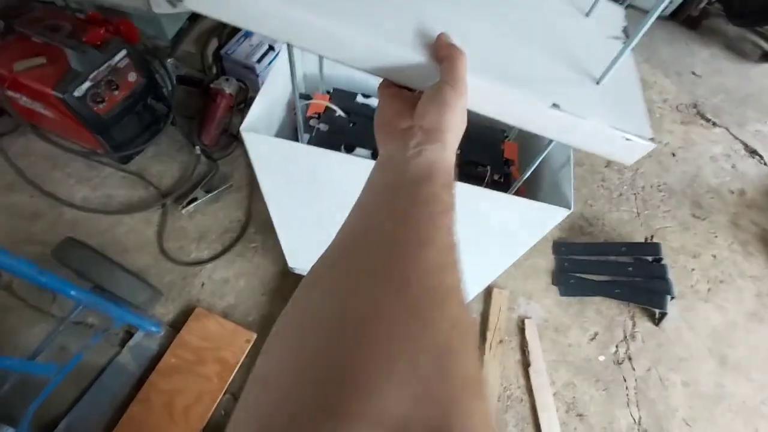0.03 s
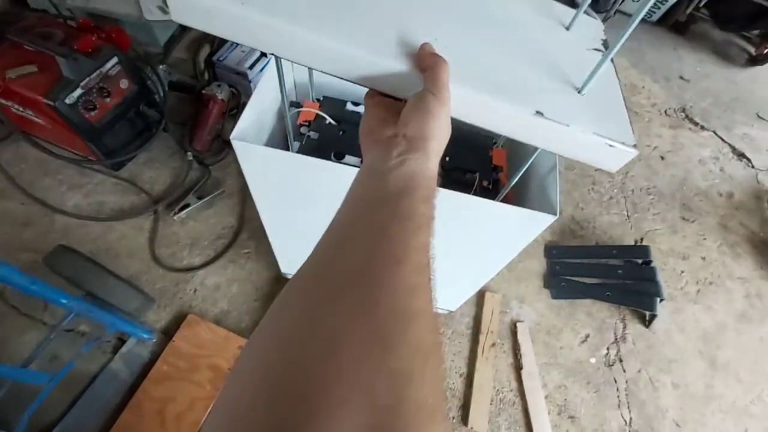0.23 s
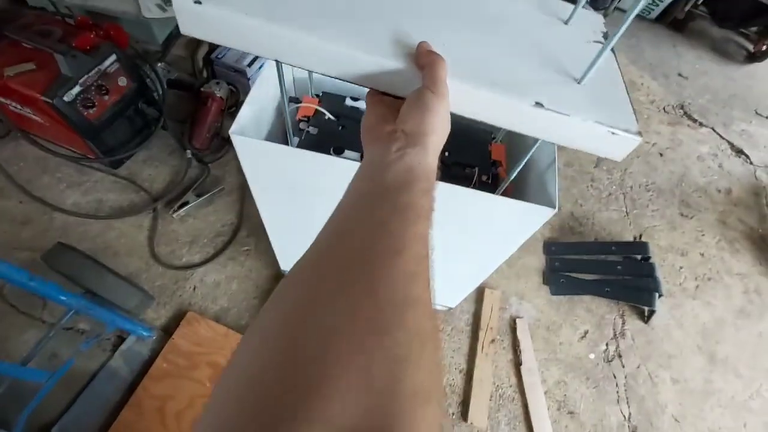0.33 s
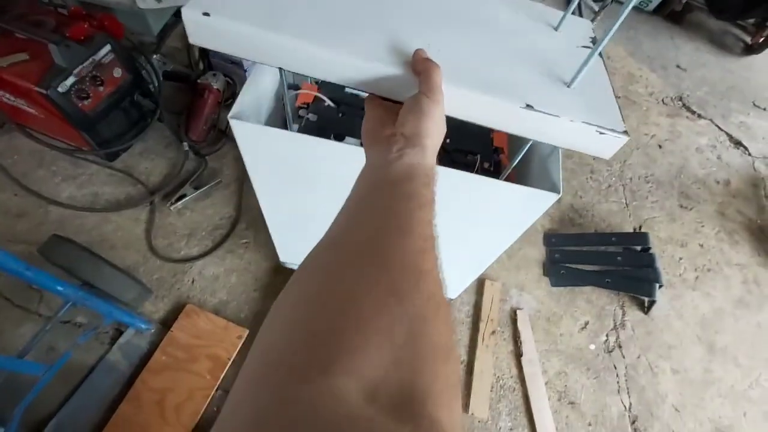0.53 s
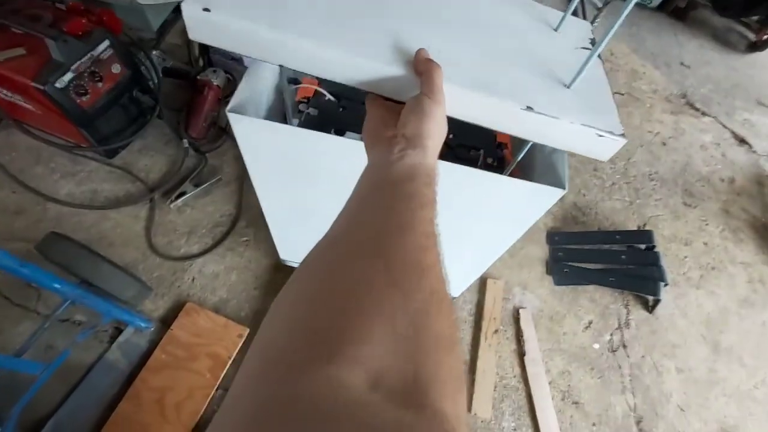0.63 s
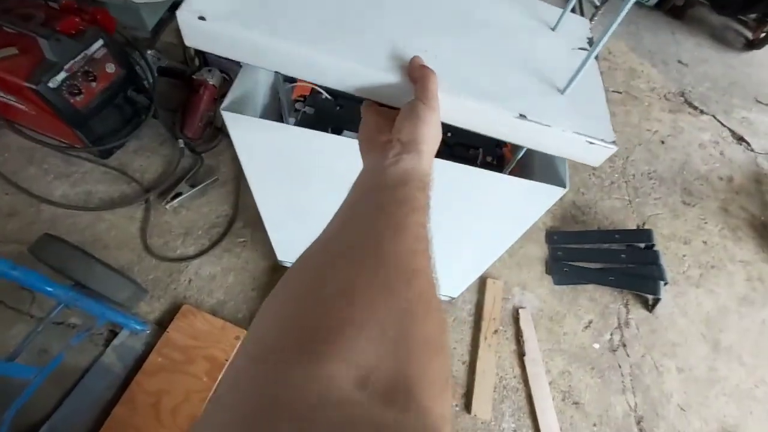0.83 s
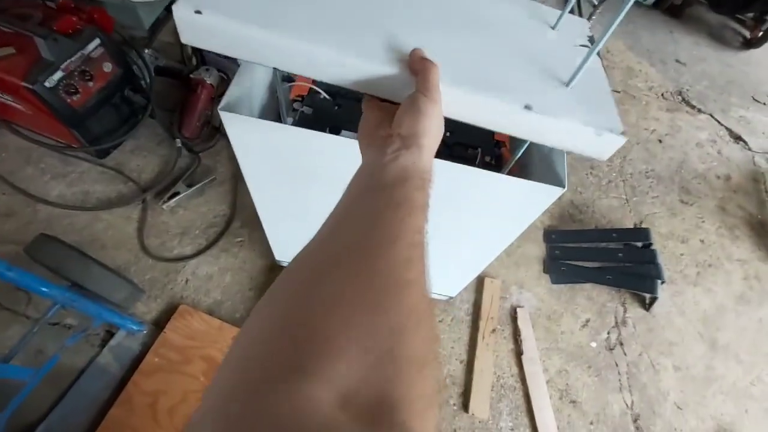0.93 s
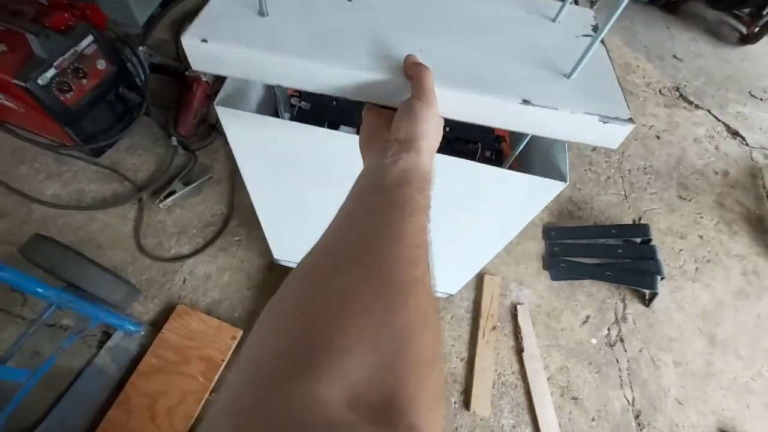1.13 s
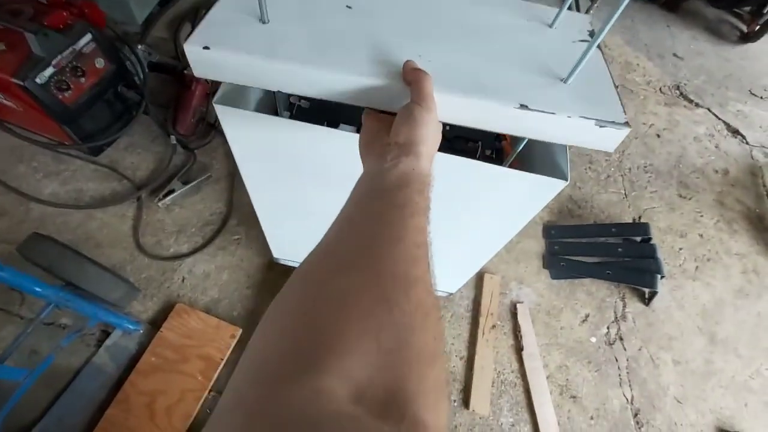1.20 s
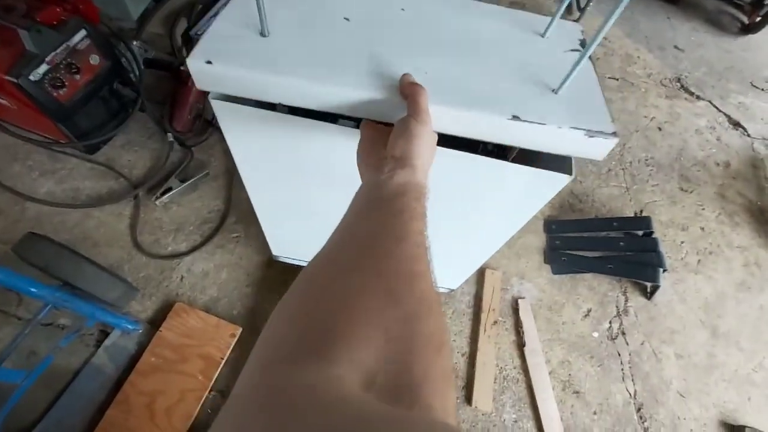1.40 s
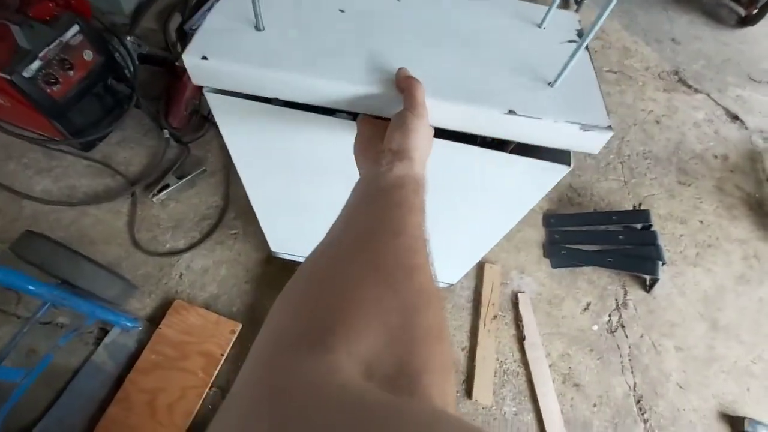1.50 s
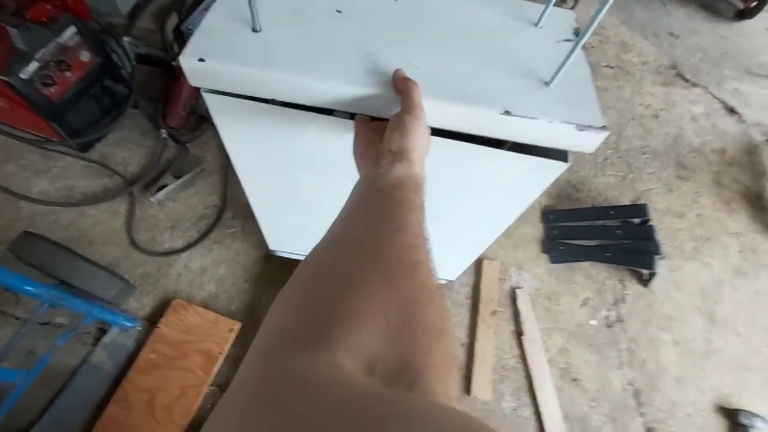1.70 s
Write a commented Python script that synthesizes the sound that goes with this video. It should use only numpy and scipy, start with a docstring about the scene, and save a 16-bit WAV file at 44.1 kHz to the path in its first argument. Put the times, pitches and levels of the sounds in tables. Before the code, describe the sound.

Sheet metal dragged over a box rim in two rattling, squealing shoves, then settling.

```python
"""Steel lid dragged over its box

A sheet-steel lid is dragged over the rim of its metal box in two long shoves, then drops into its seat.
Stick-slip friction, thousands of slips a second, drives the panels into clattering, booming vibration;
now and then the friction locks onto one panel mode and it squeals. A faint workshop rumble lies below."""
import sys
import numpy as np
from scipy import signal
from scipy.io import wavfile
from scipy.ndimage import uniform_filter1d

SR = 44100
rng = np.random.default_rng(int(sys.argv[2]) if len(sys.argv) > 2 else 0)


def waveform_to_disk(signal):
    """Save audio, clipped to [-1, 1], as 16-bit WAV at the path in sys.argv[1]."""
    frames = np.transpose(np.atleast_2d(signal))
    scaled = np.clip(frames, -1, 1) * 32767
    samples = np.round(scaled).astype(np.int16)
    wavfile.write(sys.argv[1], SR, samples)


N = 77175
T = np.arange(N) / SR

# friction of the edge on the rim: time_s, force_db, extra_treble_db
RUBBING = [(0, -29.5, -14), (0.019, -44, 2), (.045, -29, -9), (0.073, -29.5, -7), (0.106, -46.5, -22),
           (.125, -44.5, -1), (0.148, -29.5, -17), (.19, -37.5, -6.5), (0.22, -26, -11), (.236, -15.5, 1),
           (0.312, -16, 1.5), (.375, -13, 1.5), (.48, -16, 0), (.53, -18.5, 1.5), (0.628, -18, 2.5),
           (.68, -23, 0), (0.719, -23, 1), (.77, -25.5, -7.5), (.797, -21.5, 1.5), (.825, -34, -0.5),
           (0.918, -36, -13.5), (0.938, -18, 0.5), (.97, -15, 3.5), (1.035, -15.5, -1), (1.11, -12.5, 0.5),
           (1.211, -16.5, 3), (1.261, -18.5, -2.5), (1.322, -20.5, -3.5), (1.36, -13.5, 1),
           (1.426, -16, -2.5), (1.46, -26.5, -4.5), (1.509, -30.5, -8), (1.548, -27.5, 0), (1.594, -37, -5),
           (1.62, -42.5, -10), (1.691, -39.5, -4.5), (1.75, -55, -18)]
# bumps of the lid against the box: start_s, strength_db, cutoff_hz
IMPACTS = [(.001, -8, 6000), (.025, -0.5, 8600), (0.2259, 11.5, 9300), (0.366, 17, 1000),
           (0.787, 4.5, 6950), (.795, 10, 390), (.927, 5.5, 14100), (0.949, 9, 465), (1.328, 21.5, 1600),
           (1.336, 16, 800), (1.379, 15, 2465), (1.402, 16.5, 1200), (1.5185, -1.5, 9000), (1.648, 15, 280),
           (1.683, -8.5, 5100)]
# strong modes of lid and box: pitch_hz, level_db, t60_s, left_minus_right_db, left_lead_rad
PANEL_MODES = [(300.4, -24, 0.073, 39, 5), (345.3, -15, 0.19, 6.5, -0.1), (382.7, -13.5, 0.23, 3, 1.31),
               (497.6, -29.5, 1.4, 10, -0.1), (796.7, -23, 0.48, -1, 1.94), (829.7, -14, 0.17, -1.5, -0.23),
               (1004, -17.5, 0.27, 2, -.7), (1154, -13, 0.22, -5, -2.1), (1362, -28, 0.47, 24, 7.9),
               (1443, -13.5, 0.1, -1, -0.9), (1583, -19.5, 0.42, 9, -1.7), (1640, -13, .35, 1.5, -0.95),
               (1545, -40.5, 1.2, 20, -1.5), (1807, -14.5, 0.28, 2, -2.5), (1985, -15, 0.28, 15, 0),
               (2079, -12, 0.083, 16, -1.67), (2210, -13.5, 0.12, 28, 2), (2402, -14.5, .15, 24, -4.1),
               (2502, -19.5, 0.22, -1, 4.7), (2916, -17, 0.18, 7, -1.5), (3133, -24, 0.26, 6, 6.7),
               (3567, -13.5, 0.14, 11, -1.6), (4110, -18, 0.12, -6.5, -3.5), (4650, -20.5, 0.18, 19, 1),
               (5160, -21, 0.37, 7, 1.5), (6270, -22, 0.26, 15, 2.2), (7345, -25.5, .02, -6, 1.1),
               (9830, -26, 0.039, 5, 9), (10600, -18, 0.033, 7, 3.5), (11700, -22, .015, -19, 5)]
# friction locking onto a mode: start_s, length_s, pitch_hz, level_db
MODE_LOCKS = [(0.29, 0.33, 1630, -18.5), (0.366, 0.096, 890, -22), (0.44, 0.058, 2079, -19),
              (0.5, 0.19, 2079, -20), (0.55, .07, 1998, -22.5), (0.45, 0.21, 386, -27.5),
              (.93, 0.058, 350, -19), (1.38, 0.095, 340, -24.5), (.98, 0.19, 2076, -20.5),
              (1.073, 0.036, 2228, -16), (1.055, 0.173, 386, -22), (1.22, 0.046, 2222, -15.5),
              (1.204, 0.035, 2228, -16.5)]
# relative spectral density of the sheet's countless weak modes: frequency_hz, density_db
SHEET_SPECTRUM = [(40, -41), (100, -20), (175, -2), (240, -21.5), (320, -3), (480, -16), (640, -2.5),
                  (820, -4.5), (1100, -0.5), (1500, 0), (2200, -0.5), (3200, -6.5), (4200, -5), (5200, -7),
                  (7000, -12.5), (9000, -15.5), (11500, -14), (13500, -16.5), (15500, -34)]
# direction in which the weak modes radiate: frequency_hz, left_minus_right_db
SHEET_BALANCE = [(60, 3), (300, 3.5), (600, -5.5), (1100, 6.5), (1500, 30), (2200, 30), (3100, 10),
                 (4200, 0.5), (7000, -2), (9300, 5.5), (12000, 2)]
# likeness of their sound at left and right: frequency_hz, correlation
SHEET_CORRELATION = [(300, .95), (900, 0.55), (1500, 1), (3000, 0.47), (4200, -0.32), (7500, 0.19),
                     (9200, -0.37), (13000, 0.12)]

CONTACT_SPOTS, SLIPS_PER_S, SLIP_SPREAD_DB = 2, 2200, 3   # slip rate per spot and band
BOOM_BAND_HZ, TREBLE_HZ = (270, 559), 3450
FULL_FORCE_DB, BOOM_SLOPE = -17.5, 0.54   # light rubbing keeps more of its bass
SHEET_T60_S, SHEET_T60_EXPONENT = 0.17, -0.11   # ring time at 1 kHz, and its power law in frequency
CRACK_DB, CRACK_S = 1.5, 0.0053   # each contact starts with a short crack above the ring


def from_db(db):
    """Amplitude grows tenfold for every 20 dB."""
    return 10 ** (np.asarray(db) / 20)


def unit_rms(x):
    """Normalisation to a mean power of 1."""
    return x / np.sqrt(np.mean(x ** 2) + 1e-20)


def at_hz(table, hz):
    """Interpolation on a log-frequency axis."""
    freqs, values = np.transpose(table)
    return np.interp(np.log(hz), np.log(freqs), values)


def butter(x, hz, kind, order=2):
    """Causal Butterworth filtering, maximally flat in the passband."""
    sections = signal.butter(order, np.clip(hz, 10, .45 * SR), kind, fs=SR, output="sos")
    return signal.sosfilt(sections, x + 1e-18)


def drift(cutoff_hz):
    """Low-passed noise wanders smoothly, with rms 1."""
    return unit_rms(butter(rng.standard_normal(2 * N), cutoff_hz, "low")[N:])


def radiate(swing, pan_db, lead_rad):
    """A vibration reaches left and right with a difference of level and phase."""
    gains = unit_rms(from_db(np.array([pan_db, -pan_db]) / 2))
    phasors = np.exp(.5j * np.array([lead_rad, -lead_rad]))
    return np.sqrt(2) * np.real(np.outer(gains * phasors, swing))


def contact_pressure(judder_db=1.0, grit_db=2.2):
    """Friction follows pressure: the force judders, and its treble comes in gritty surges."""
    time_s, force_db, treble_db = np.transpose(RUBBING)
    return (np.interp(T, time_s, force_db) + judder_db * drift(cutoff_hz=59),
            np.interp(T, time_s, treble_db) + grit_db * drift(cutoff_hz=165))


def stick_slip(force_db, treble_db):
    """Stick-slip friction at one spot is a dense train of uneven impulses, scaled by the force."""
    sizes = from_db(SLIP_SPREAD_DB * rng.standard_normal((3, N))) * rng.choice([-1, 1], (3, N))
    slipping = rng.random((3, N)) < SLIPS_PER_S / SR
    low, mid, high = unit_rms(sizes * slipping)
    boom_db = FULL_FORCE_DB + BOOM_SLOPE * (force_db - FULL_FORCE_DB)
    boom = butter(low, BOOM_BAND_HZ, "band", order=3) * from_db(boom_db)
    notched = butter(mid, BOOM_BAND_HZ, "stop", order=3)
    middle = butter(notched, TREBLE_HZ, "low", order=3) * from_db(force_db)
    treble = butter(high, TREBLE_HZ, "high", order=3) * from_db(force_db + treble_db)
    return boom + middle + treble


def impacts():
    """An impact is one pulse of force; the softer the contact, the lower its cutoff."""
    return sum(from_db(db) * butter(signal.unit_impulse(N, int(start_s * SR)), cutoff_hz, "low")
               for start_s, db, cutoff_hz in IMPACTS)


def sheet_clatter(force):
    """Modal overlap: weak modes merge into a dense ring, each third octave decaying at its own rate."""
    t, ring = T[:SR // 2], 0
    crack = 1 + from_db(CRACK_DB) * np.exp(-t / CRACK_S)
    edges_hz = 35 * 2 ** (np.arange(28) / 3)
    for low, high in zip(edges_hz, edges_hz[1:]):
        hz = np.sqrt(low * high)
        t60_s = SHEET_T60_S * (hz / 1000) ** SHEET_T60_EXPONENT
        burst = rng.standard_normal((2, len(t))) * crack * np.exp(-np.log(1000) * t / t60_s)
        mid, side = map(unit_rms, butter(burst, [low, high], "band", order=3))
        correlation = at_hz(SHEET_CORRELATION, hz)
        pair = np.sqrt(1 + correlation) * mid + np.sqrt(1 - correlation) * side * [[1], [-1]]
        pan = unit_rms(from_db(at_hz(SHEET_BALANCE, hz) * np.array([[.5], [-.5]])))
        ring += from_db(at_hz(SHEET_SPECTRUM, hz)) * np.sqrt(high - low) * pan * pair
    response = unit_rms(ring) / np.sqrt(len(t))   # unit energy
    return signal.fftconvolve(force[None], response, axes=1)[:, :N]


def panel_resonance(force, evenness=0.77, averaging_s=0.094):
    """Forced resonance: the edge damps a mode that swings wide and feeds one that falls behind."""
    out, window = 0, int(averaging_s * SR)
    for hz, db, t60_s, pan_db, lead_rad in PANEL_MODES:
        radius = np.exp(-np.log(1000) / (t60_s * SR))
        pole, loss = radius * np.exp(2j * np.pi * hz / SR), 1 - radius ** 2
        swing = signal.lfilter([np.sqrt(loss)], [1, -pole], force)
        # the force in the surrounding octave sets the power that the mode is held near
        drive = butter(force, [hz / np.sqrt(2), hz * np.sqrt(2)], "band")
        fed_power = signal.lfilter([loss], [1, -radius ** 2], drive ** 2) * SR / (hz * np.sqrt(2))
        steady_power = np.abs(uniform_filter1d(fed_power, window))
        swing_power = np.abs(uniform_filter1d(np.abs(swing) ** 2, window))
        steadying = (steady_power / (swing_power + 1e-12)) ** (evenness / 2)
        out += from_db(db) * radiate(swing * steadying, pan_db, lead_rad)
    return out


def workshop_rumble(level_db=-49, band_hz=(86, 152)):
    """The room's background is stationary noise in a low band."""
    return from_db(level_db) * unit_rms(butter(rng.standard_normal(2 * N), band_hz, "band")[N:])


def squeals(waver_hz=5.07, roughness_db=2):
    """Self-excited vibration: a locked mode swells and fades, heard from the nearest mode's direction."""
    out = 0
    for start_s, length_s, hz, db in MODE_LOCKS:
        pan_db, lead_rad = min(PANEL_MODES, key=lambda mode: abs(mode[0] - hz))[-2:]
        swell = np.sin(np.pi * np.clip((T - start_s) / length_s, 0, 1))
        phase = 2 * np.pi * np.cumsum(hz + waver_hz * drift(cutoff_hz=31.5)) / SR
        amplitude = swell * from_db(db - roughness_db * drift(cutoff_hz=72))
        out += radiate(amplitude * np.exp(1j * phase), pan_db, lead_rad)
    return out


def scene(sheet_db=-2.5, modes_db=0.4):
    """Superposition: rubs and bumps drive the same panels; each spot wakes its own mix of weak modes."""
    force_db, treble_db = contact_pressure()
    rubs = [stick_slip(force_db, treble_db) for _ in range(CONTACT_SPOTS)]
    bumps = impacts()
    share = 1 / np.sqrt(CONTACT_SPOTS)   # independent spots add in power
    clatter = share * sum(sheet_clatter(rub + bumps) for rub in rubs)
    ringing = panel_resonance(share * sum(rubs) + bumps)
    return from_db(sheet_db) * clatter + from_db(modes_db) * ringing + squeals() + workshop_rumble()


def record(dry, cutoff_hz=15700):
    """Soft saturation rounds the highest peaks, and a steep low-pass cuts the top."""
    rounded = dry / (1 + dry ** 6) ** (1 / 6)
    return signal.sosfilt(signal.ellip(10, .2, 80, cutoff_hz, fs=SR, output="sos"), rounded)


dry = scene()
out = record(dry)
waveform_to_disk(out)
```